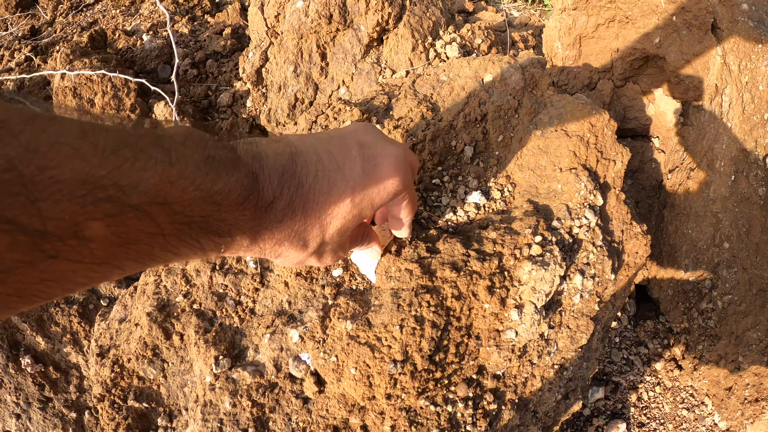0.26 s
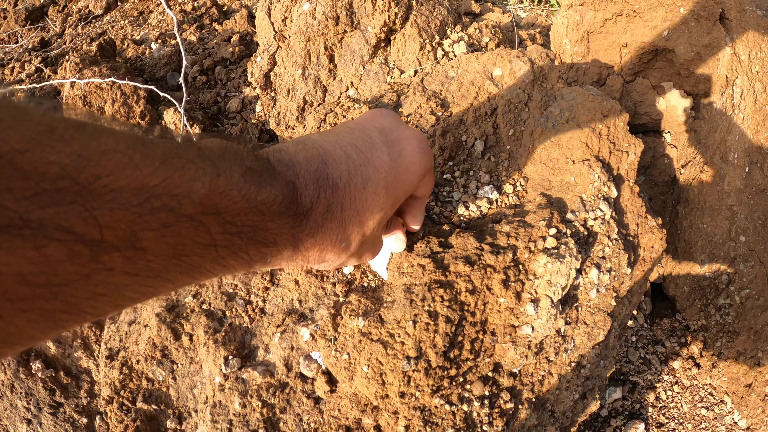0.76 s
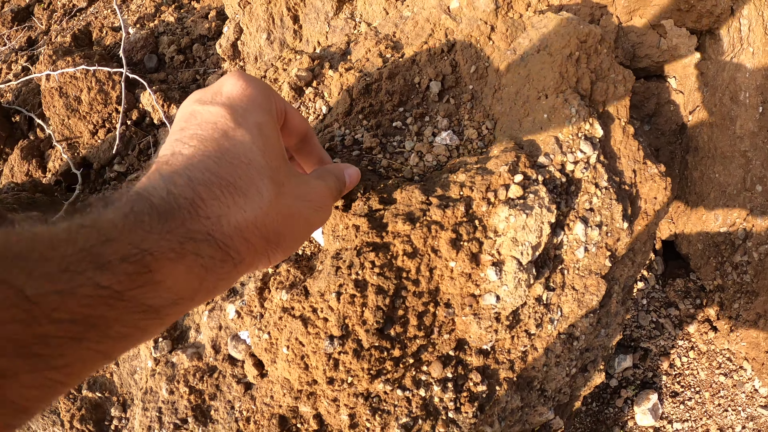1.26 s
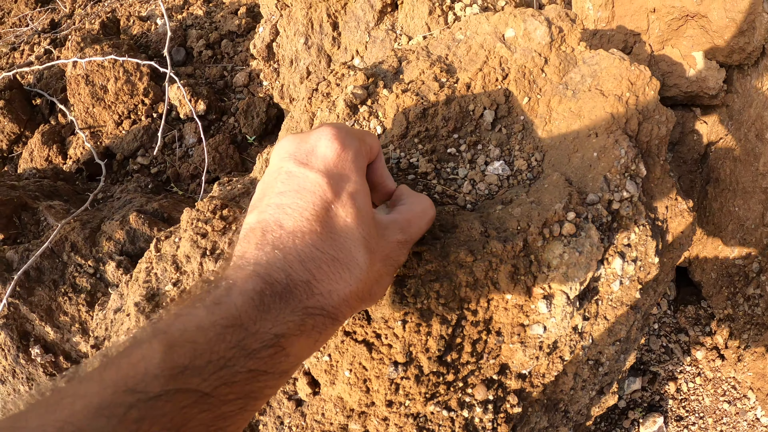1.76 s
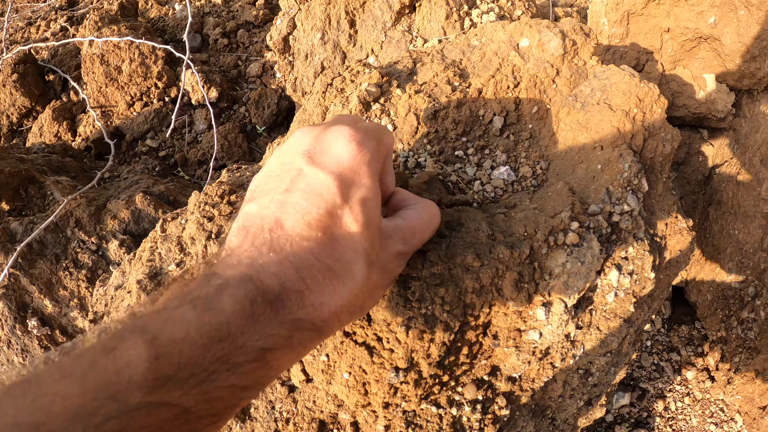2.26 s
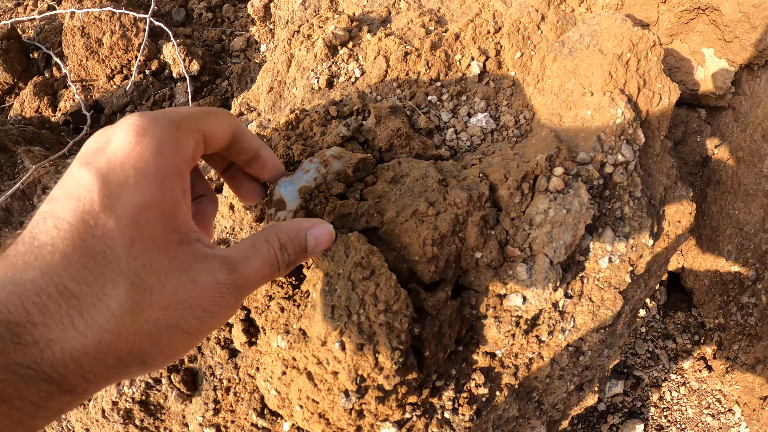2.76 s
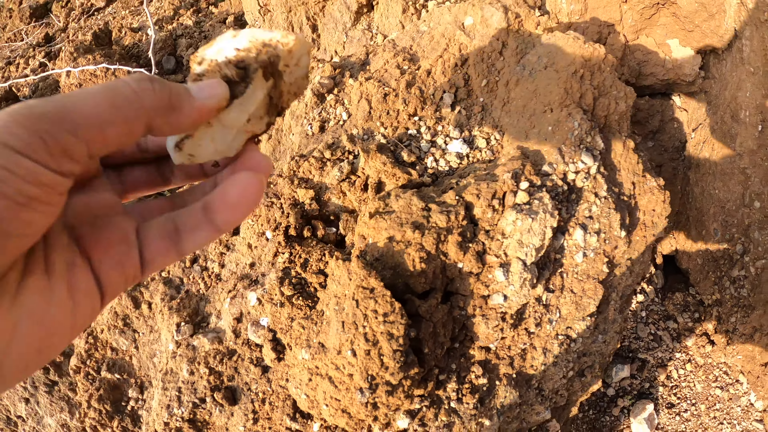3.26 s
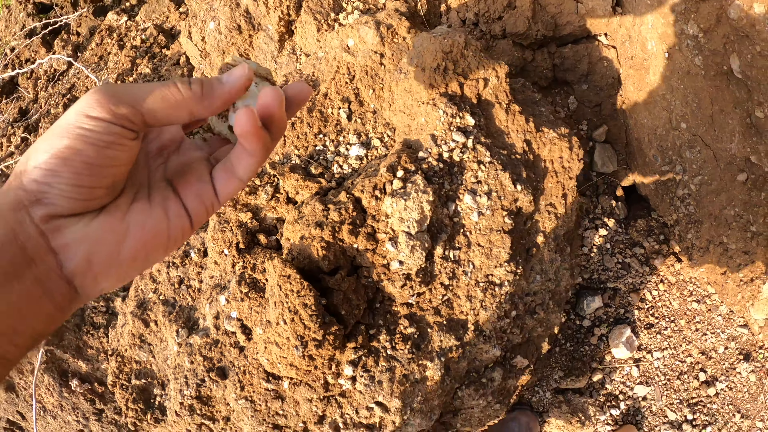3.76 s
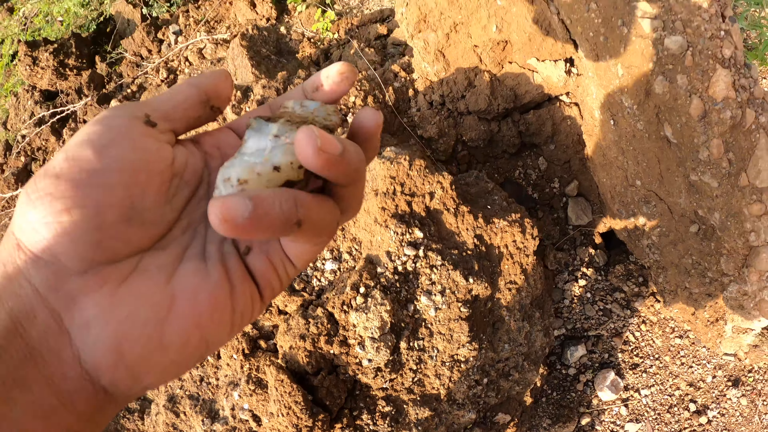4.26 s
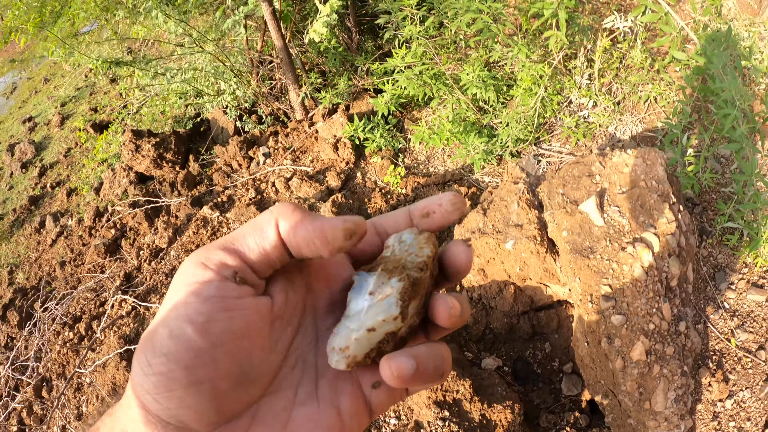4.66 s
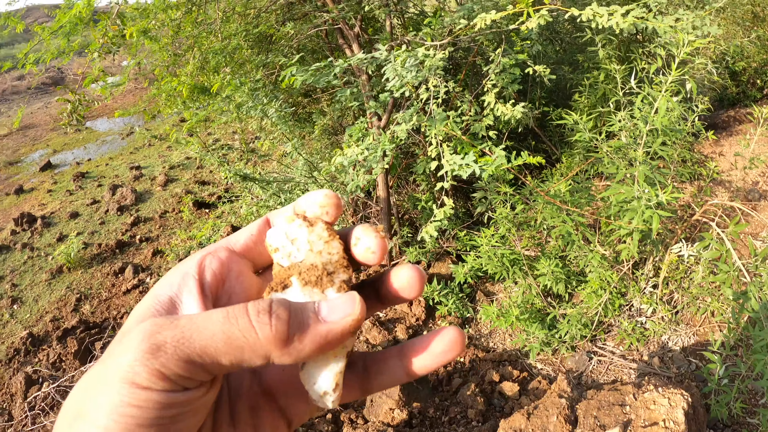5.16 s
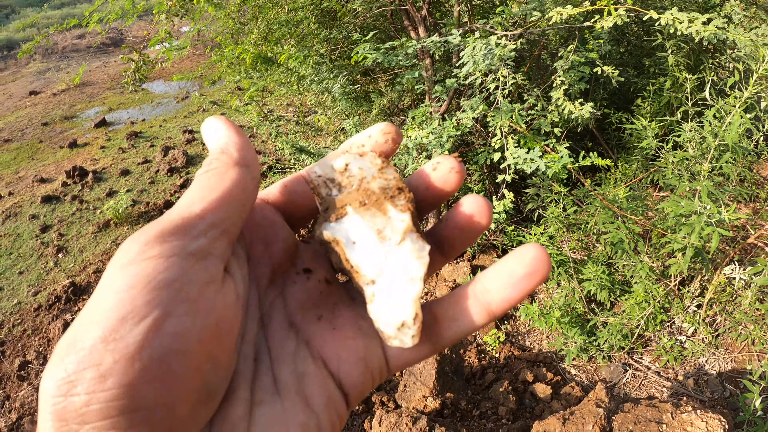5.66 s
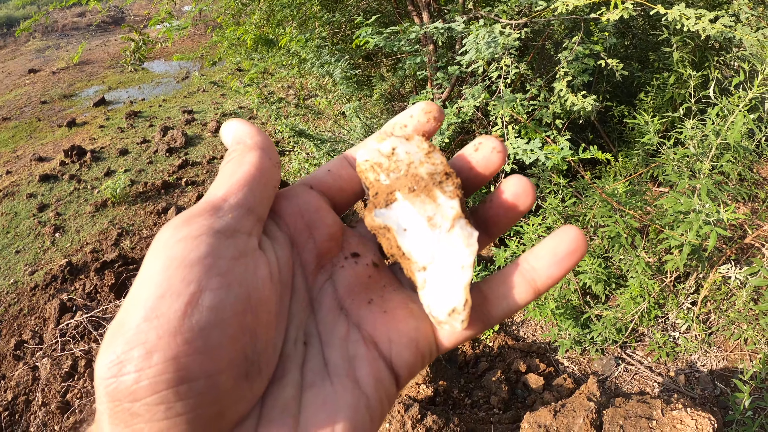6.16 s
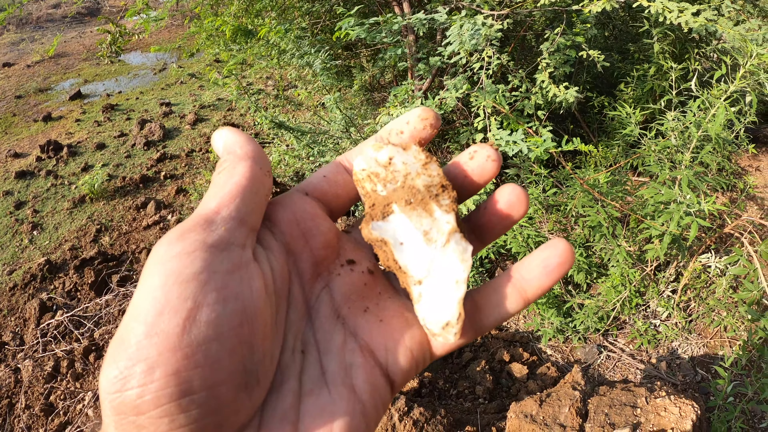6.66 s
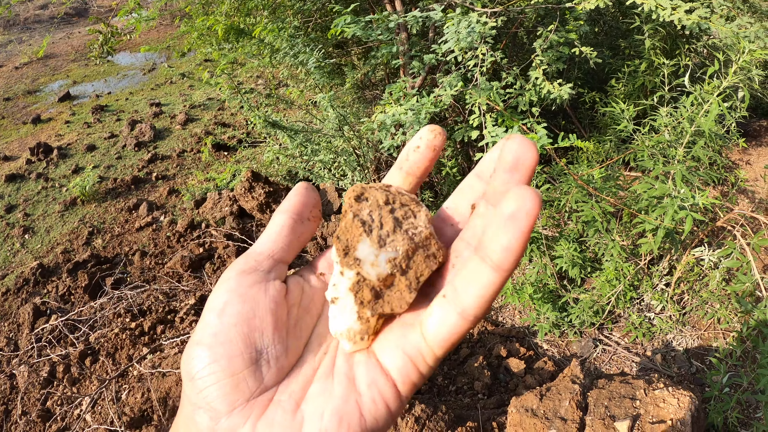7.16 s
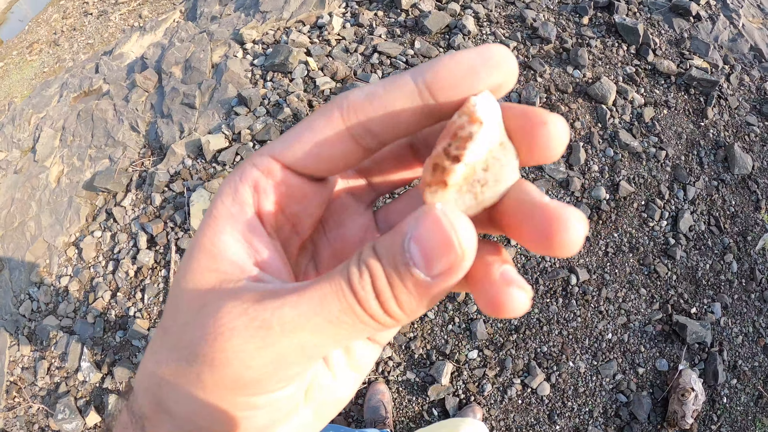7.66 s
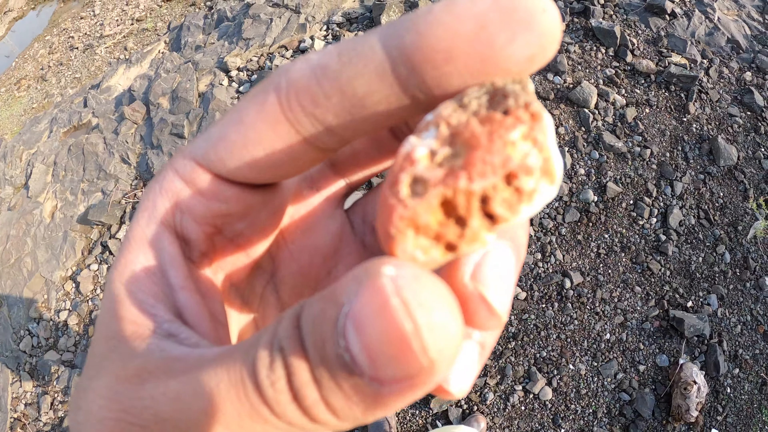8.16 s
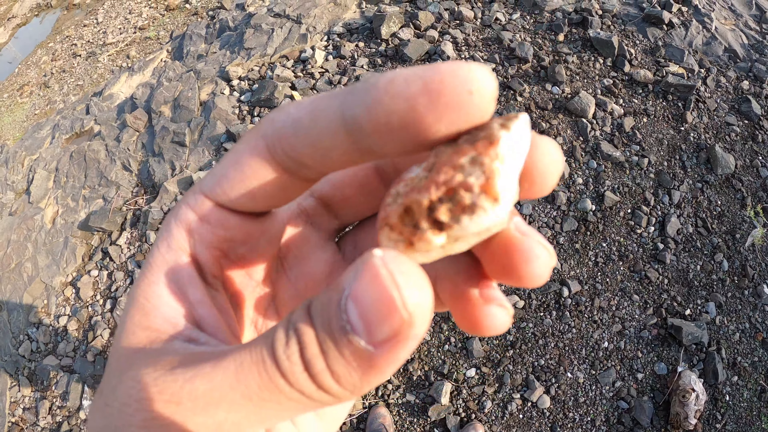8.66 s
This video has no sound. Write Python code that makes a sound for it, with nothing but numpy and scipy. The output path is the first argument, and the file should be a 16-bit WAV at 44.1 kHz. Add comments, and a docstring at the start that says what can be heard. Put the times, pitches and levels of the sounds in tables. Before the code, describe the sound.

Outdoor birdsong and humming insects, gritty digging snaps and thumping wind gusts, then a short gap and a duller place with rumble and faint chirps.

```python
"""Birdsong and digging in dry scrubland

A warbler repeats a quick phrase of gliding whistles over a drone of noise-blurred tones from far insects,
a cricket of fast falling wing strokes, and farther birds that are partly or mostly echo.
A hand pries a stone out of dry soil and rubs off the grit: filtered noise, grains, snaps and low knocks.
Gusts of low noise thump the microphone. After a short silence comes a second place, heard in mono:
a distant engine's rumble and hum, two bands of insects and fainter birds."""
import sys
import numpy as np
from scipy import signal
from scipy.fft import rfft, irfft
from scipy.io import wavfile

SR = 44100
rng = np.random.default_rng(int(sys.argv[2]) if len(sys.argv) > 2 else 0)


def unload_audio(sound):
    """Save the sound as a 16-bit wav file, at the path given as the first command line argument."""
    columns = np.transpose(np.atleast_2d(sound))
    # keep every value between -1 and 1, then stretch to whole-number steps
    steps = np.round(np.clip(columns, -1, 1) * 32767)
    wavfile.write(sys.argv[1], SR, steps.astype(np.int16))


N = 392931
TIME = np.arange(N) / SR  # seconds


def amp(db):
    """Turns decibels into a gain."""
    return 10 ** (np.asarray(db) / 20)


def unit(x):
    """Scales a sound to rms 1."""
    return x / np.sqrt(np.mean(x ** 2) + 1e-20)


def curve(rows, axis=1):
    """Draws straight lines through one column of a time table, giving a value at every sample."""
    rows = np.asarray(rows)
    return np.interp(TIME, rows[:, 0], rows[:, axis])


def colour(x, points):
    """Filters a sound by a spectrum of (frequency_hz, level_db) points."""
    point_hz, point_db = np.transpose(points)
    hz = np.fft.rfftfreq(x.shape[-1], 1 / SR)
    gain_db = np.interp(np.log(hz + 1), np.log(point_hz + 1), point_db)
    return irfft(rfft(x) * amp(gain_db), x.shape[-1])


def band(x, lo_hz, hi_hz):
    """Keeps the sound between two frequencies, with gentle slopes."""
    sos = signal.butter(2, [lo_hz, min(hi_hz, SR / 2 - 1)], "band", fs=SR, output="sos")
    return signal.sosfilt(sos, x)


def pair(likeness):
    """Makes two channels of white noise, from unrelated (0) to identical (1)."""
    a, b = rng.standard_normal((2, N))
    c = np.clip(likeness, 0, 1)
    return np.array([a, c * a + np.sqrt(1 - c * c) * b])


def wander(per_s):
    """Joins random values, per_s of them a second, into a curve of rms 1."""
    knots = rng.standard_normal(4096)
    return unit(np.interp(TIME * per_s, np.arange(len(knots)), knots))


def pan(db):
    """Gives the two channel gains for a left-right difference; above 0 is left."""
    return amp([[db / 2], [-db / 2]])


def add(mix, s, sound):
    """Mixes a sound in at time s."""
    part = mix[..., max(round(s * SR), 0):][..., :sound.shape[-1]]
    part += sound[..., :part.shape[-1]]


def scatter(x, t60):
    """Echoes off leaves and banks: sparse random taps that fall by 60 dB in t60 seconds."""
    t = TIME[:SR]
    taps = rng.standard_normal((2, SR))
    taps *= (rng.random((2, SR)) < .08) * (t > .004)
    taps *= np.exp(-np.log(1000) * t / t60)
    taps /= np.linalg.norm(taps, axis=1, keepdims=True)
    return signal.oaconvolve(x[None], taps, axes=1)[:, :N]


def note(length, start_hz, middle_hz, end_hz, db, crest=1.81):
    """A pure whistle gliding through three pitches; it swells, then stops more quickly."""
    u = np.linspace(0, 1, max(int(length * SR), 16))
    glide = np.polyfit([0, .5, 1], [start_hz, middle_hz, end_hz], 2)
    hz = np.polyval(glide, u)
    # no two notes are quite alike
    hz *= 1 + 0.008 * np.interp(u, np.linspace(0, 1, 5), rng.standard_normal(5))
    loudness = abs(np.sin(np.pi * u ** crest)) ** 0.64
    return amp(db) * np.sqrt(2) * loudness * np.sin(2 * np.pi * np.cumsum(hz) / SR)


def sing(rows):
    """A track of single notes, each at its own time."""
    out = np.zeros(N)
    for s, *shape in rows:
        add(out, s, note(*shape))
    return out


def repeats(runs, every_s):
    """Evenly spaced (time_s, level_db) calls from the first to the last of each run."""
    calls = []
    for first, last, db in runs:
        count = round((last - first) / every_s) + 1
        calls += [(s, db) for s in np.linspace(first, last, count)]
    return calls


def phrases(calls, notes):
    """The same few notes sung around the time of each (time_s, level_db) call."""
    return sing([(s + offset, *shape, db + note_db)
                 for s, db in calls for offset, *shape, note_db in notes])


def slurs(rows, fall):
    """Notes that slide from a share above their pitch to the same share below it."""
    return sing([(s, length, hz * (1 + fall), hz, hz * (1 - fall), db) for s, length, hz, db in rows])


def swell(s, length, attack_s, release_s):
    """A level that rises to 1 at time s, holds, and dies away."""
    before = np.maximum((s - TIME) / attack_s, 0)
    after = np.maximum((TIME - s - length) / release_s, 0)
    return np.exp(-np.minimum(before + after, 20))


def swells(rows, attack_s, release_s):
    """The joint level of (start_s, length_s, level_db) events; their powers add up."""
    powers = [(amp(db) * swell(s, length, attack_s, release_s)) ** 2 for s, length, db in rows]
    return np.sqrt(sum(powers))


def grains(per_s, spread_db):
    """Random clicks, a few of them larger than the rest if there is a spread."""
    clicks = rng.random(N) < per_s / SR
    sizes = amp(spread_db * np.minimum(rng.exponential(1, N), 3))
    return clicks * sizes * rng.choice([-1, 1], N)


def warbler(bounce_s=0.0033, bounce_db=-12):
    """One phrase again and again; as the bird turns, its direct sound and echo trade places."""
    # notes of the phrase: from_top_note_s, length_s, start_hz, middle_hz, end_hz, relative_level_db
    # (lengths, times and pitches before the song's drift)
    song_notes = [(-.108, .022, 3397, 3403, 3490, -9.5), (-.077, 0.013, 4430, 4164, 3910, -12.5),
                  (-.06, .018, 4744, 4593, 4210, -6.5), (-.036, 0.012, 5450, 5200, 4390, -9),
                  (-.025, .008, 5990, 5060, 4540, -5.5), (-.017, .025, 5880, 5656, 5320, -6),
                  (0.012, .015, 4460, 4480, 4710, -1.5), (0.037, 0.006, 8150, 6380, 5240, -15.5),
                  (0.038, .007, 6330, 5030, 3860, -5.5), (.048, .012, 3800, 3453, 3180, -10),
                  (0.057, 0.02, 3287, 3132, 3020, -14)]
    # phrases: top_note_s, relative_level_db, left_right_db, echo_db, high_note_emphasis_db_per_octave
    song_calls = [(.726, -32.5, 5, -4.5, 10), (1.046, -29, 2.5, -7.5, 9), (1.351, -34, 13, -2.5, 12),
                  (1.666, -36, 9.5, 1, 5), (1.984, -34, 6, -4, -2), (2.301, -33, 5, -6, 3),
                  (2.65, -32, 7.5, -7.5, 12.5), (2.982, -32.5, 8.5, -8.5, 5), (3.319, -34.5, 6, -5, 9),
                  (3.654, -43.5, 18.5, 4.5, 1), (4.005, -43, 4, 2.5, -0.5), (6.364, -36, 9, -8.5, -6.5),
                  (6.669, -34, 7.5, -7, -1), (6.973, -34.5, 10, -5, 1), (7.277, -32.5, 9, -7.5, 2),
                  (7.585, -34.5, 15, -8.5, 5.5)]
    # drift of the song: time_s, pitch_factor, time_stretch_factor
    song_drift = [(.7, 0.97, 1.03), (1.4, 1.002, 0.95), (2.3, 0.99, 1.034), (3, 0.98, 1.03), (4, 1, 1.03),
                  (6.4, 1.026, 1.02), (7.6, 1, 1.02)]
    direct, thrown = np.zeros((2, N)), np.zeros((2, N))
    when, pitches, stretches = np.transpose(song_drift)
    for k, (s, db, side_db, echo_db, bright_db) in enumerate(song_calls):
        pitch = np.interp(s, when, pitches)
        stretch = np.interp(s, when, stretches)
        for offset, length, start_hz, middle_hz, end_hz, note_db in song_notes:
            emphasis_db = bright_db * np.log2(middle_hz / 5000)
            level_db = db + note_db + emphasis_db + 2.6 * rng.standard_normal()
            sound = note(length * stretch, start_hz * pitch, middle_hz * pitch, end_hz * pitch, level_db)
            note_s = s + offset * stretch
            add(direct, note_s, pan(side_db) * sound)
            add(thrown[k % 2], note_s, amp(echo_db) * sound)  # every other phrase lights up other bushes
    direct[1] = np.roll(direct[1], 1)  # one sample later on the right
    direct += amp(bounce_db) * np.roll(direct, round(bounce_s * SR), axis=1)  # off the ground
    bushes = sum(scatter(x, t60=0.3) for x in thrown)
    banks = scatter(thrown.sum(0), t60=.6)
    echo = amp(-1.5) * bushes + amp(-8.5) * banks
    return amp(-4.5) * direct + pan(1.4) * echo


def crumbling():
    """Soil gives way in slides: random grains over a little hiss, both coloured like earth."""
    # slides: start_s, length_s, relative_level_db
    slides = [(2.333, 0.037, -52), (2.378, 0.042, -51.5), (2.52, .012, -61)]
    # spectrum of loose soil: frequency_hz, relative_level_db
    soil_spectrum = [(35, -20), (60, -4), (364, -2), (539, -16.5), (895, -6.5), (1360, 3.5), (1750, -20.5),
                     (1960, -2), (4620, -14), (6530, -28), (15000, -47.5)]
    level = swells(slides, attack_s=0.0085, release_s=0.052)
    earth = grains(1400, spread_db=7) + 0.44 * pair(0.18)
    return unit(colour(earth, soil_spectrum)) * amp(9.5) * level


def rubbing():
    """Fingers stroke gritty stone: finer grains and hiss that swell with every stroke."""
    # strokes: start_s, length_s, level_db (before the left-right balance)
    strokes = [(0, 0.34, -72.5), (.77, 0.11, -69), (1.02, .05, -78), (1.11, 0.028, -71), (1.25, 0.13, -72),
               (1.58, 0.01, -56.5), (2.36, 0.075, -56), (2.45, .16, -62.5), (2.85, 0.52, -70.5),
               (3.66, 0.47, -66.5), (4.37, 0.31, -70), (4.84, .03, -66), (5.055, 0.03, -65),
               (5.165, .035, -68), (5.295, 0.018, -64), (5.355, 0.053, -53.5), (5.508, 0.041, -54.5),
               (6.37, .03, -82), (7.06, .1, -75)]
    # spectrum of grit: frequency_hz, relative_level_db
    grit_spectrum = [(1500, -9), (4000, 2.5), (7000, -5), (10000, -7.5), (13000, -15), (15500, -27)]
    level = swells(strokes, attack_s=0.012, release_s=0.027)
    level += amp(-88)  # faint grit all the time
    grit = grains(970, spread_db=3) + 0.28 * pair(0.1)
    return pan(-6.0) * unit(colour(grit, grit_spectrum)) * level


def snapping():
    """Grit and pebbles snap: three bursts of band noise, each dying at its own speed."""
    # snaps: start_s, crack_relative_db, body_relative_db, fizz_relative_db, left_right_db
    snaps = [(.859, -28.5, -44.5, -72, 0), (1.5805, -30, -39, -49.5, 3), (2.3798, -30, -22.5, -59, -2),
             (2.391, -31, -29, -59, 2), (2.4025, -19, -36, -55, -12), (2.4234, -30, -36, -63, 2),
             (2.622, -22, -60, -48, 2), (3.7234, -30, -56, -66, 6), (3.7938, -19.5, -65, -69, 2),
             (3.8343, -26, -54, -75, .5), (4.3853, -40.5, -43, -69, -1), (5.442, -28, -70, -44, -8),
             (5.4596, -32, -70, -60, 10), (5.5184, -31, -71, -45, 5)]
    out, t = np.zeros((2, N)), TIME[:2048]
    for s, db, body_db, fizz_db, side_db in snaps:
        a, b, c = rng.standard_normal((3, len(t)))
        crack = amp(db - 13.5) * unit(band(a, 1400, 3850)) * np.exp(-t / 0.0024)
        body = amp(body_db - 8) * unit(band(b, 180, 2200)) * np.exp(-t / 0.0087)
        fizz = amp(fizz_db - 3.0) * unit(band(c, 5100, 11000)) * np.exp(-t / 0.0037)
        add(out, s, pan(side_db) * (crack + body + fizz))
    return out


def scraping():
    """A thumb drags a crust off the stone: a short, dense swell of breaking grains."""
    # scrapes: middle_s, relative_level_db, width_s
    scrapes = [(2.403, -42, 0.0012), (4.026, -52, 0.0053), (5.351, -29, 0.0014), (5.359, -24, 0.0037),
               (5.365, -37.5, 0.01), (5.513, -43, 0.015)]
    # spectrum of breaking crust: frequency_hz, relative_level_db
    crust_spectrum = [(150, -2.5), (400, -11), (900, -13.5), (2500, 0.5), (4500, 0.5), (7500, 3.5),
                      (11000, 0), (13500, -2), (15500, -23.5)]
    level = sum(amp(db) * np.exp(-((TIME - s) / width) ** 2) for s, db, width in scrapes)
    crust = grains(5900, spread_db=0.0) + .5 * pair(0.2)
    return pan(-6) * level * amp(-5.5) * unit(colour(crust, crust_spectrum))


def knocks():
    """Hand and clods knock on dry earth, which does not ring: a low push that is gone at once."""
    # knocks: start_s, level_db (as each begins to die away)
    thuds = [(0.864, -54), (1.584, -52), (2.344, -41), (2.382, -40), (2.405, -38), (2.522, -46.5),
             (2.86, -56), (3.029, -56), (3.769, -51)]
    out, t = np.zeros(N), TIME[:4096]
    for s, db in thuds:
        push = unit(band(rng.standard_normal(len(t)), 45, 230))
        add(out, s, amp(db) * push * np.exp(-t / 0.022))
    return out


def wind():
    """Gusts on the microphone, mostly left: deep noise with a slower wake, a higher flutter and eddies."""
    # gusts: start_s, length_s, deep_bass_relative_db, flutter_relative_db
    gusts = [(0, 0.014, -36.5, -62), (.06, 0.035, -45.5, -76), (4.33, 0.0073, -45, -78),
             (4.419, 0.013, -27, -51), (4.51, .015, -18.5, -39), (4.573, 0.05, -25.5, -41.5),
             (4.65, 0.11, -28.5, -35.5), (4.789, 0.014, -32.5, -72), (4.901, .015, -39, -85),
             (4.987, 0.016, -43.5, -78), (5.056, 0.17, -56, -87), (6.391, 0.034, -26, -59.5),
             (6.487, 0.029, -30.5, -65), (6.546, .015, -35, -74), (6.609, 0.024, -50.5, -81)]
    # spectrum of the deep bass: frequency_hz, relative_level_db
    bass_spectrum = [(15, -13.5), (30, 7.5), (85, 2.5), (160, -10.5), (250, -28), (500, -68), (1000, -87)]
    # spectrum of the flutter: frequency_hz, relative_level_db
    flutter_spectrum = [(60, -23.5), (170, -1.5), (260, 6), (400, -9), (600, -29.5), (1200, -65.5)]
    # single eddies striking the microphone: middle_s, relative_level_db, pitch_hz, width_s
    eddies = [(4.419, -9, 90, .0037), (4.524, -11.5, 93.5, 0.023), (4.662, -16, 150, 0.01),
              (4.697, -14, 186, .0035), (4.749, -9.5, 140, 0.0046), (6.492, -21, 99, 0.0036)]
    attack_s = 0.011
    pushes = [(s, length, db) for s, length, db, _ in gusts]
    flutters = [(s, length, db) for s, length, _, db in gusts]
    wake = amp(-22.5) * swells(pushes, attack_s, release_s=0.099)  # weaker turbulence that dies slowly
    deep_level = swells(pushes, attack_s, release_s=.013) + wake
    high_level = swells(flutters, attack_s, release_s=0.0042)
    deep = deep_level * amp(-1.5) * unit(colour(pair(0.43), bass_spectrum))
    t = TIME[:4096] - TIME[2048]
    for s, db, hz, width in eddies:
        thump = np.exp(-(t / width) ** 2) * np.sin(2 * np.pi * hz * t)
        add(deep, s + t[0], amp(db - 7) * thump)
    high = high_level * amp(1.5) * unit(colour(pair(0.25), flutter_spectrum))
    return pan(11.3) * deep * amp(-1.5) + pan(2) * high


def drone():
    """Many far insects blur into fuzzy tones that swell independently and drift together in pitch."""
    # tones of the chorus: pitch_hz (before the drift), width_hz, relative_level_db
    tones = [(1396, 98, -10), (1512, 146, 3), (1626, 278, -3), (1696, 365, -5), (1937, 440, -15.5)]
    # the whole chorus: time_s, level_db (before the left-right balance), pitch_factor
    course = [(0, -47, 1.01), (1.2, -49.5, 1.008), (2.7, -48.5, 1.014), (4.4, -48, 1.004),
              (5.6, -49.5, .995), (7.6, -51, 0.97)]
    drift, out = np.cumsum(curve(course, axis=2)) / SR, np.zeros((2, N))
    for hz, width_hz, db in tones:
        low_pass = signal.butter(2, width_hz / 2, fs=SR, output="sos")
        blur = signal.sosfilt(low_pass, pair(0.82) + 1j * pair(0.57))
        tone = unit((blur * np.exp(2j * np.pi * hz * drift)).real)  # noise moved up to the tone's pitch
        out += amp(db + 1.12 * wander(8.3)) * tone
    return pan(2.3) * amp(curve(course)) * unit(out)


def cricket(strokes_per_s=120, top_hz=8780, fall_hz=850, duty=.62):
    """Each chirp is a run of slightly uneven wing strokes, each falling in pitch."""
    # loudness: time_s, level_db (before echo and left-right balance), echo_db
    loudness = [(0, -89, 6), (4, -88.5, 7), (5, -83, 5), (6, -77.5, -3.5), (7.6, -74, 1)]
    # the cricket speeds up a little: time_s, chirps_per_s
    chirp_rate = [(0, 6.7), (4, 6.8), (5, 7), (7.6, 7.02)]
    rate = curve(chirp_rate)
    beats = np.cumsum(rate) / SR
    beat = (beats - np.interp(7.204, TIME, beats)) % 1  # one chirp begins at 7.204 s
    stroke = (beat / rate * strokes_per_s + .08 * wander(30)) % 1
    hz = top_hz - fall_hz * stroke + 50 * wander(100)
    strength = np.sin(np.pi * stroke) ** 2 * (beat < duty)
    wings = strength * np.sin(2 * np.pi * np.cumsum(hz) / SR)
    sound = amp(curve(loudness)) * unit(wings)
    echo = scatter(sound * amp(curve(loudness, axis=2)), t60=0.2)
    return pan(-6.5) * (sound + echo)


def long_whistle():
    """One drawn-out note that sags and levels off."""
    # path of the note: time_s, pitch_hz, relative_level_db
    path = [(5.83, 6000, -68), (5.855, 6140, -56.5), (5.89, 5760, -55), (5.93, 5400, -65),
            (5.99, 5520, -66)]
    sounding = (TIME > path[0][0]) & (TIME < path[-1][0])
    tone = np.sin(2 * np.pi * np.cumsum(curve(path)) / SR)
    return sounding * amp(curve(path, axis=2)) * np.sqrt(2) * tone


def other_birds():
    """Neighbours answer from the bushes; the farther they are, the more echo."""
    # falling slurs of nearer birds: start_s, length_s, pitch_hz, relative_level_db
    near_slurs = [(3.815, 0.022, 4020, -53), (4.12, .023, 3800, -51.5), (4.395, 0.024, 4270, -52),
                  (4.765, .02, 4000, -57), (5.1, 0.019, 3830, -56), (5.7, 0.024, 4100, -52),
                  (5.766, 0.015, 4070, -53), (5.98, 0.02, 4070, -53), (6.085, 0.027, 3960, -56),
                  (6.255, 0.044, 3900, -54), (6.8, 0.05, 5220, -47.5), (7.09, 0.027, 4140, -53),
                  (7.21, .055, 4170, -49.5), (7.42, .03, 4170, -52), (7.52, 0.028, 4430, -53)]
    # a second bird's two notes: from_call_time_s, length_s, start_hz, middle_hz, end_hz, relative_level_db
    two_notes = [(-.003, 0.028, 6840, 5850, 4280, -0.00025), (0.028, 0.022, 6200, 6500, 7080, -1)]
    # quick runs of that call: first_call_s, last_call_s, relative_level_db
    two_note_runs = [(1.198, 1.56, -53), (4.797, 4.913, -68.5), (5.029, 5.262, -61.5)]
    # a thin rising note: length_s, start_hz, middle_hz, end_hz
    thin_note = (.04, 5950, 6250, 6500)
    # even runs of the thin note: first_note_s, last_note_s, relative_level_db
    thin_runs = [(1.84, 4.42, -62.5), (6.155, 7.485, -62)]
    # falling whistles from deep in the bushes: start_s, length_s, pitch_hz, relative_level_db
    deep_whistles = [(.12, 0.08, 2610, -58.5), (.185, 0.044, 2350, -56.5), (3.16, .035, 2436, -57),
                     (3.39, .08, 2520, -55.5), (3.495, 0.037, 2200, -54.5)]
    near = slurs(near_slurs, fall=.12) + long_whistle()
    near += phrases(repeats(two_note_runs, every_s=.12), two_notes)
    near += sing([(s, *thin_note, db) for s, db in repeats(thin_runs, every_s=.325)])
    near = .75 * near + .7 * scatter(near, t60=.3)
    far = slurs(deep_whistles, fall=.07)
    far = .25 * far + .85 * scatter(far, t60=.38)
    return pan(5.6) * amp(1.0) * near + pan(1.1) * amp(9.5) * far


def strays(per_s=18, low_hz=3306, high_hz=5080, spread_db=10):
    """Faint slurs at random times, mostly echo, of any pitch within the birds' range."""
    # loudness of the slurs: time_s, relative_level_db
    stray_level = [(.5, -68), (1.2, -55), (4, -59), (4.8, -66), (5.6, -63), (6.3, -54.5), (7.6, -54.5)]
    calls = []
    for k, (when, length, pitch, loud) in enumerate(rng.random(size=(160, 4))):
        hz = low_hz + (high_hz - low_hz) * pitch
        calls.append(((k + when) / per_s, .025 * (.5 + length), hz, spread_db * (loud - .5)))
    sound = slurs(calls, fall=.08) * amp(curve(stray_level))
    return pan(4) * (.45 * sound + scatter(sound, t60=.35))


def hooting(gap=0.0997, second_db=-6, hoot_hz=1077, bend_hz=22):
    """A far bird's double hoot, mostly echo; each hoot bends up and back in pitch."""
    # bouts of double hoots: first_s, last_s, relative_level_db
    bouts = [(.085, 1.567, -63.5), (2.735, 4.72, -61.5), (5.305, 7.275, -61)]
    shape = (.075, hoot_hz - bend_hz, hoot_hz + bend_hz / 2, hoot_hz - bend_hz)
    hoots = sing([(s + k * gap, *shape, db + k * second_db)
                  for s, db in repeats(bouts, every_s=.5) for k in (0, 1)])
    distant = .5 * hoots + scatter(hoots, t60=.75)
    return pan(4.4) * amp(2.0) * distant


def twitter():
    """Five hundred random short notes, blurred by long echoes into the twitter of many far birds."""
    # loudness: time_s, relative_level_db
    twitter_level = [(0, -55), (.45, -61.5), (.7, -62.5), (4.3, -60.5), (5, -74), (5.6, -80), (6, -65.5),
                     (7.6, -58.5)]
    rows = []
    for when, length, pitch, fall in rng.random((500, 4)):
        hz = 3200 + 2600 * pitch ** 1.3
        start_hz, end_hz = hz * (1.3 + .1 * fall), hz * (.98 - 0.091 * fall)
        rows.append((when * N / SR, 0.01132 + 0.02 * length, start_hz, hz, end_hz, 0))
    chirps = sing(rows)
    blurred = unit(.4 * chirps + scatter(chirps, t60=1.))
    return pan(4.9) * amp(curve(twitter_level) + 2.5) * blurred


def far_trill():
    """A far trill low in the bushes: a narrow band of noise throbbing about 12 times a second."""
    # loudness: time_s, relative_level_db
    trill_level = [(0, -78), (3.5, -64.5), (5, -65.5), (5.5, -70.5), (7.6, -76)]
    throb = np.sin(np.pi * 12.3 * TIME + .5 * wander(3)) ** 2
    return amp(curve(trill_level)) * unit(band(pair(0.38), 2756, 2880) * (0.53 + throb))


def open_air():
    """A steady low wash of coloured noise, and a faint breeze of low noise that comes and goes."""
    # spectrum of the open air: frequency_hz, relative_level_db
    air_spectrum = [(20, 11.5), (60, -14), (170, 6.5), (320, -6), (700, -12.5), (1100, -23), (2400, -6),
                    (3300, -4.5), (4500, -9), (6000, -4), (7200, -23.5), (9000, -16), (11000, -61.5),
                    (15000, -61.5)]
    wash = amp(-60.5) * unit(colour(pair(0.3), air_spectrum))
    lull = amp(3 * wander(7))
    breeze = amp(-69) * lull * unit(band(pair(1.0), 33, 80))
    return wash + breeze


def shore_birds():
    """Two small birds of the second place, with their echo."""
    # first bird's notes: from_phrase_time_s, length_s, start_hz, middle_hz, end_hz, relative_level_db
    small_phrase = [(-.009, 0.017, 3730, 3664, 3590, 0.41), (.034, 0.018, 5060, 4870, 4750, -1.5),
                    (.058, .018, 4330, 4230, 4170, -1.5), (.073, 0.028, 4940, 4480, 4460, 0.82)]
    # its phrases, the first note just ahead of each time: phrase_time_s, relative_level_db
    small_song = [(8.044, -53.5), (8.305, -49.5), (8.552, -51), (8.818, -50.5)]
    # neighbour's pip and lower slur: from_slur_s, length_s, start_hz, middle_hz, end_hz, relative_level_db
    pip_notes = [(-.036, 0.0214, 3760, 3550, 3460, -3), (0, 0.04, 3240, 3130, 2880, 0)]
    # its calls: slur_start_s, relative_level_db
    pip_calls = [(8.078, -50), (8.397, -48.5), (8.715, -51.5)]
    chirps = phrases(small_song, small_phrase) + phrases(pip_calls, pip_notes)
    return amp(0.5) * chirps + amp(-4.0) * scatter(chirps, t60=0.51)[0]


def shore():
    """The second place, in mono: engine rumble and unsteady hum, two bands of insects, two small birds."""
    # spectrum of the rumble: frequency_hz, relative_level_db
    rumble_spectrum = [(12, -35), (20, -24), (43, -0.5), (108, -9), (151, -3.5), (445, -17), (656, -29.5),
                       (1390, -13.5), (1780, -26), (3090, -29.5), (3860, -29), (4310, -31.5), (5240, -35),
                       (5850, -28), (15000, -83)]
    # loudness of all but the birds: time_s, relative_level_db
    place_level = [(7.8, -69.5), (7.872, -46.5), (8.08, -38.5), (8.26, -40), (8.9, -41.5)]
    # humming tones of the engine, each wavering in level: pitch_hz, relative_level_db
    engine_tones = [(48.4, -1.5), (96.8, -16.5), (145.3, -17), (193.6, -32)]
    rumble = amp(1) * unit(colour(rng.standard_normal(N), rumble_spectrum))
    hum = np.zeros(N)
    for hz, db in engine_tones:
        tone = np.sin(2 * np.pi * hz * TIME + 0.18 * wander(5))
        hum += amp(db + wander(5.2)) * np.sqrt(2) * tone
    insects = amp(-13.0) * unit(band(rng.standard_normal(N), 1385, 1540))
    insects += amp(-40) * unit(band(rng.standard_normal(N), 5100, 6200))
    return (rumble + hum + insects) * amp(curve(place_level)) + shore_birds()


def scene():
    """The two places, one after the other, with a short silence between."""
    first_ends_s, second_begins_s = 7.615, 7.79
    first = warbler() + crumbling() + rubbing() + snapping() + scraping() + knocks() + wind()
    first += drone() + cricket() + other_birds() + strays() + hooting()
    first += twitter() + far_trill() + open_air()
    fade_out = np.clip((first_ends_s - TIME) / 0.0019, 0, 1)
    fade_in = np.clip((TIME - second_begins_s) / 0.039, 0, 1)
    return first * fade_out + shore() * fade_in


def record(dry):
    """The recorder's band limit: a steep low-pass takes off the highest treble."""
    edge_hz = 15400
    low_pass = signal.firwin(255, edge_hz, window=("kaiser", 9), fs=SR)
    return signal.oaconvolve(dry, low_pass[None], "same", axes=1)


dry = scene()
out = record(dry)
unload_audio(out)
```